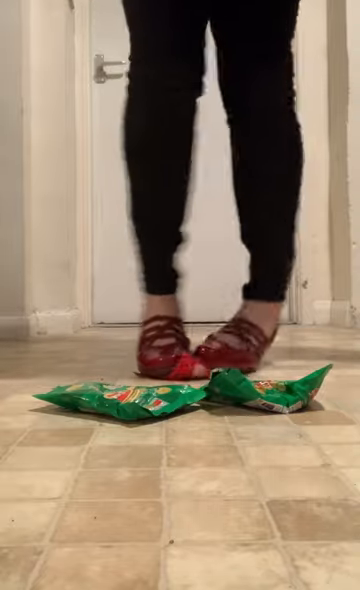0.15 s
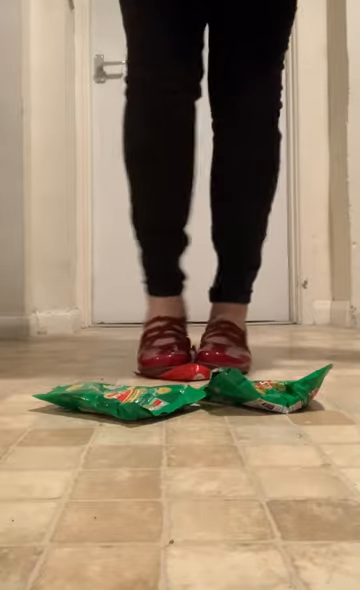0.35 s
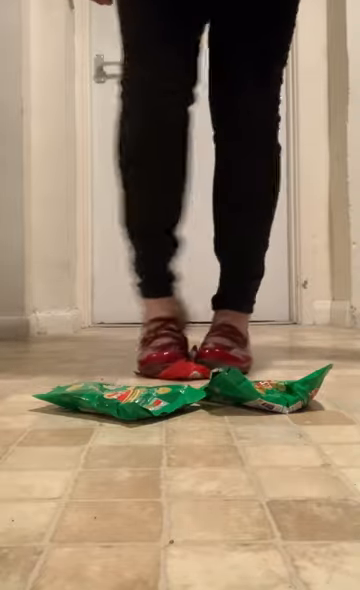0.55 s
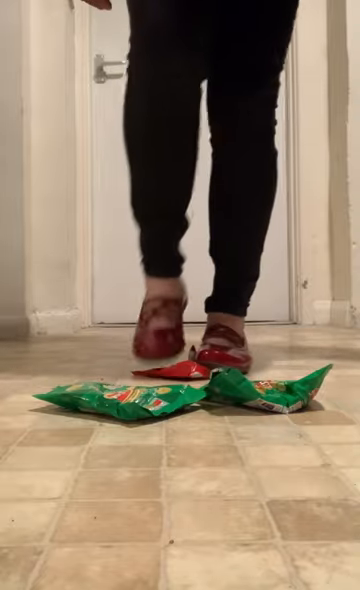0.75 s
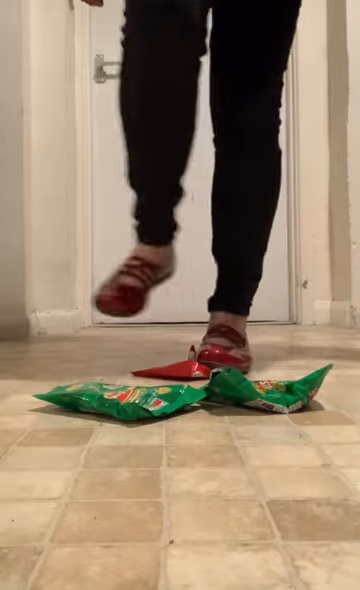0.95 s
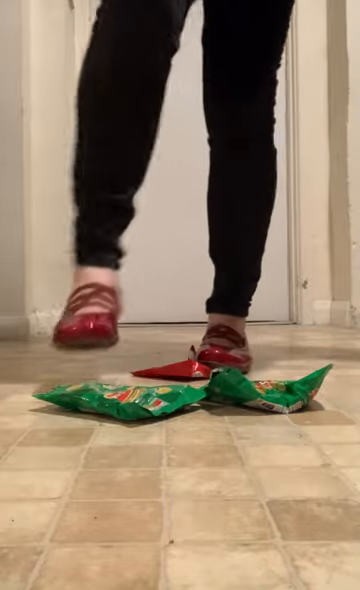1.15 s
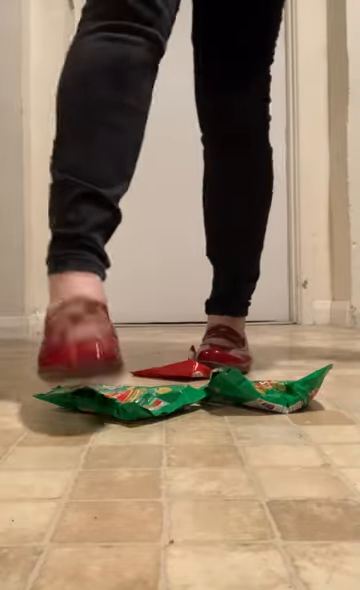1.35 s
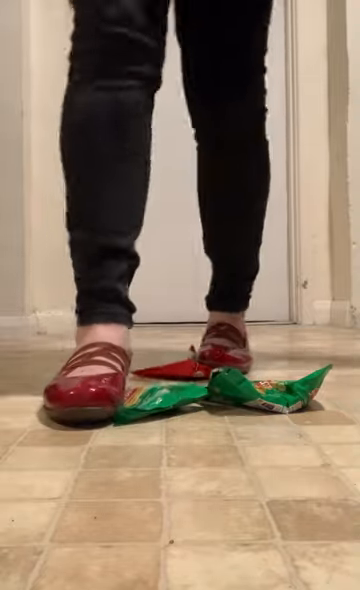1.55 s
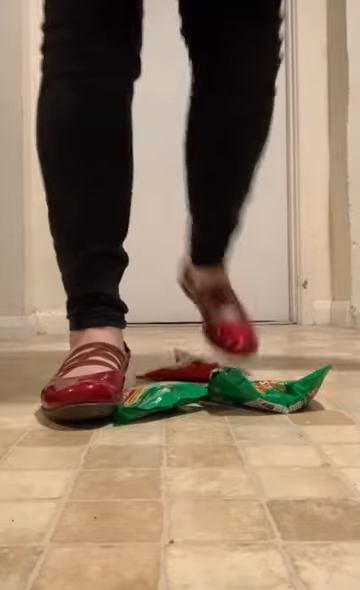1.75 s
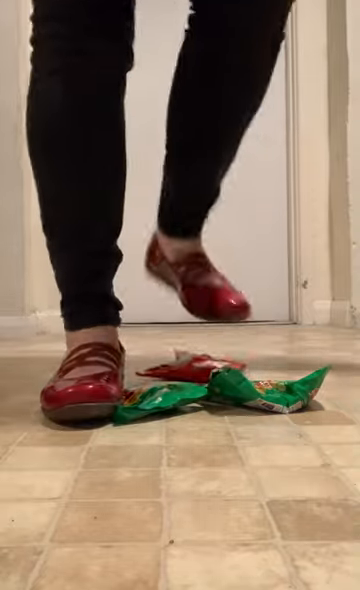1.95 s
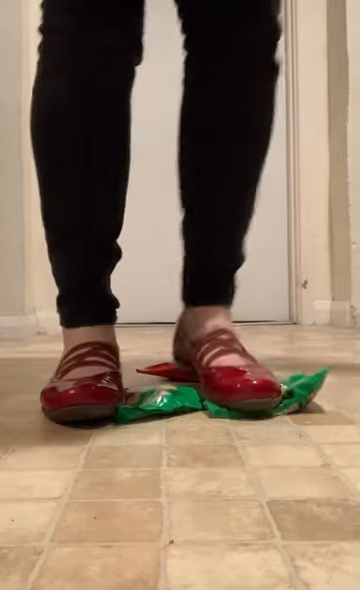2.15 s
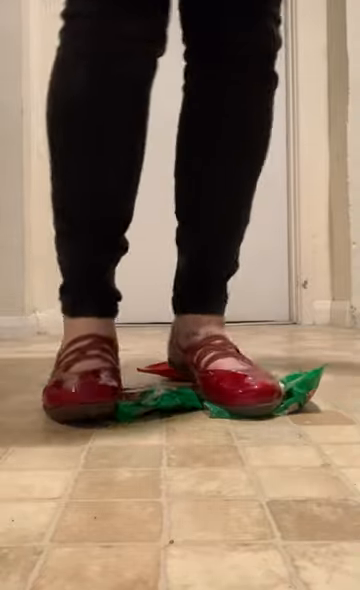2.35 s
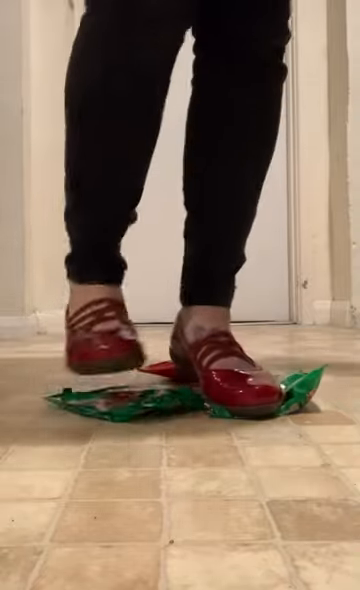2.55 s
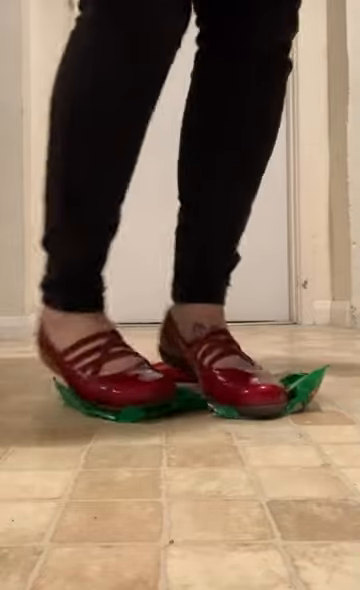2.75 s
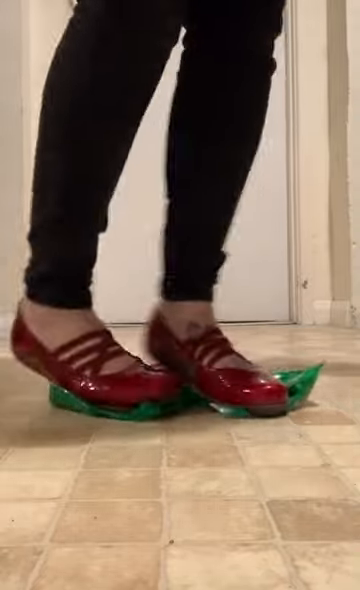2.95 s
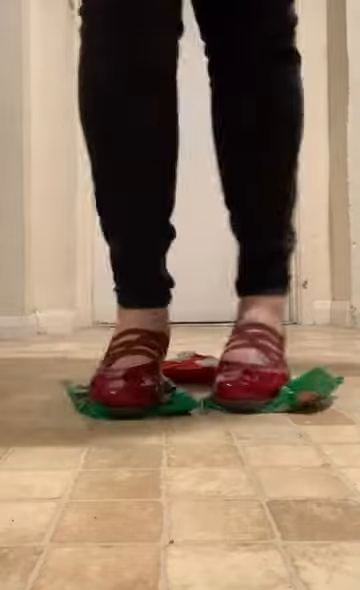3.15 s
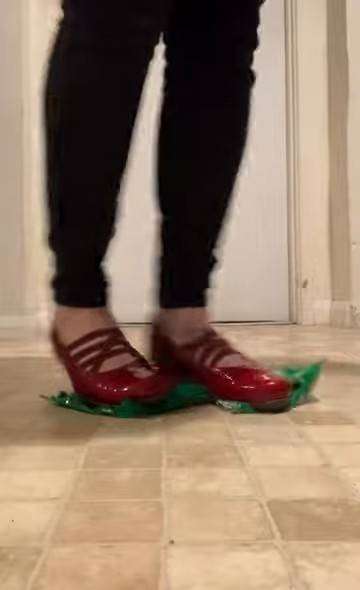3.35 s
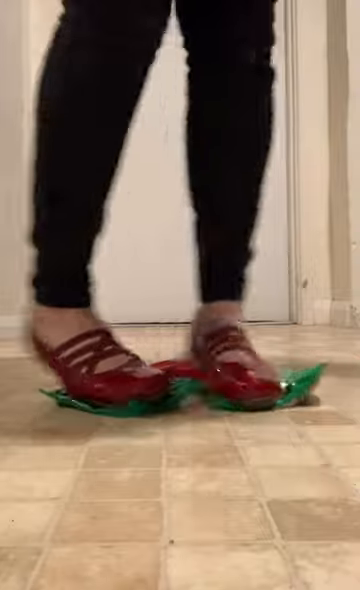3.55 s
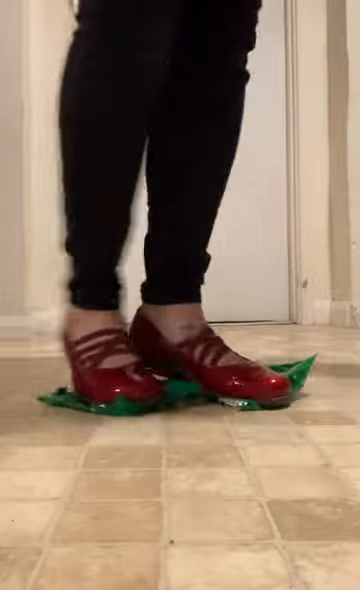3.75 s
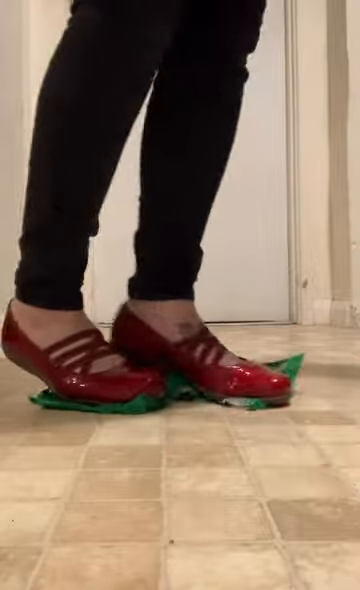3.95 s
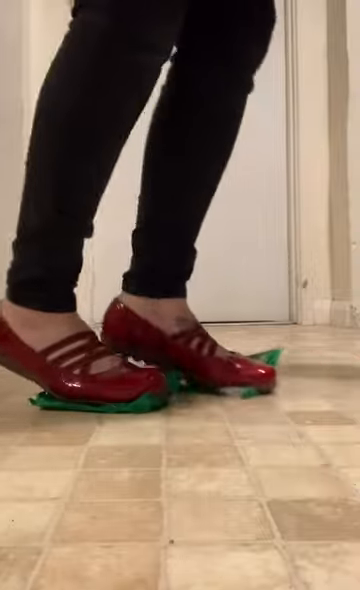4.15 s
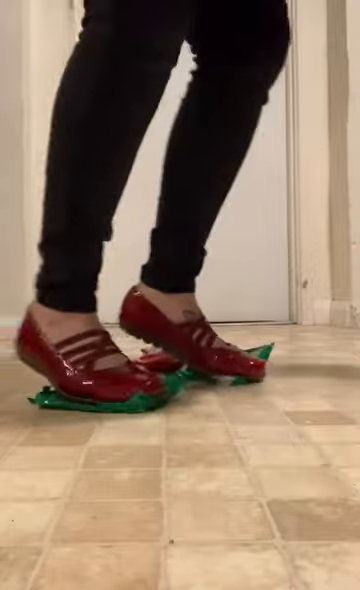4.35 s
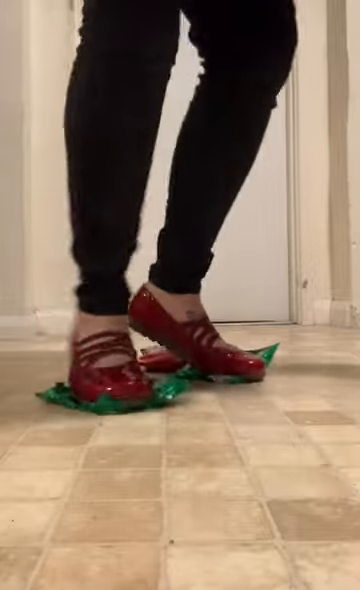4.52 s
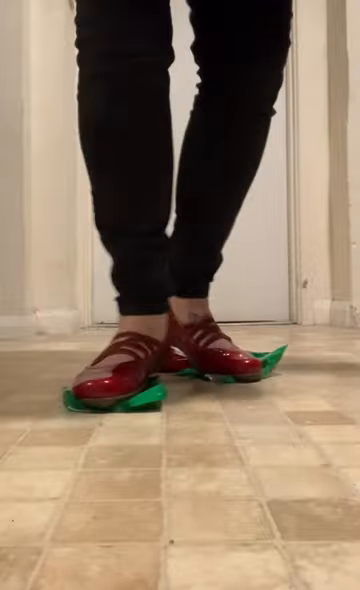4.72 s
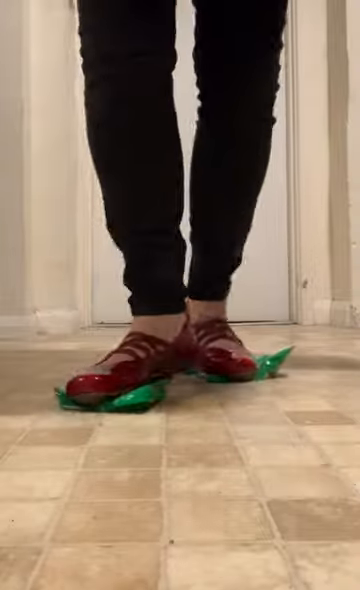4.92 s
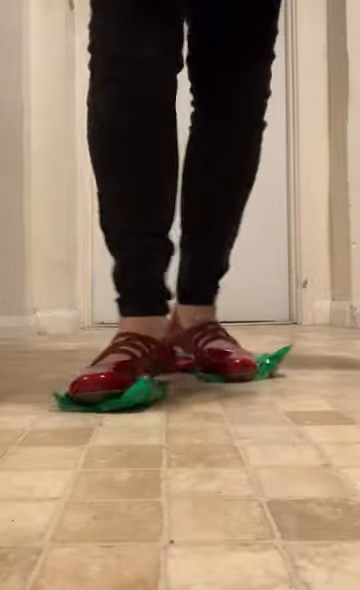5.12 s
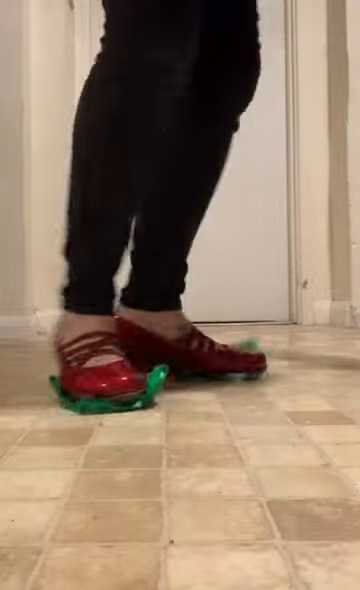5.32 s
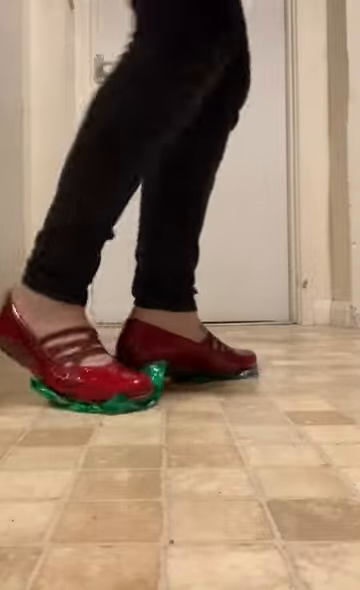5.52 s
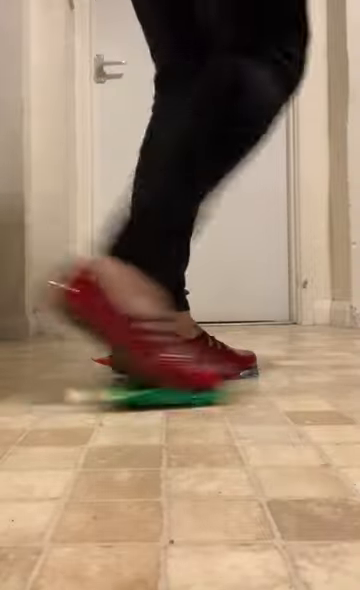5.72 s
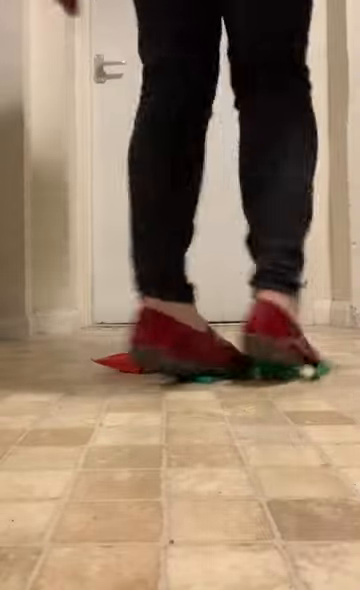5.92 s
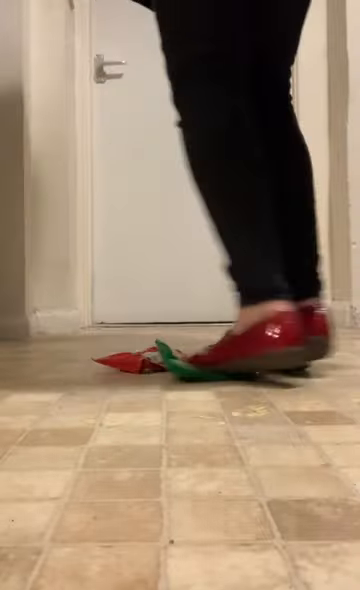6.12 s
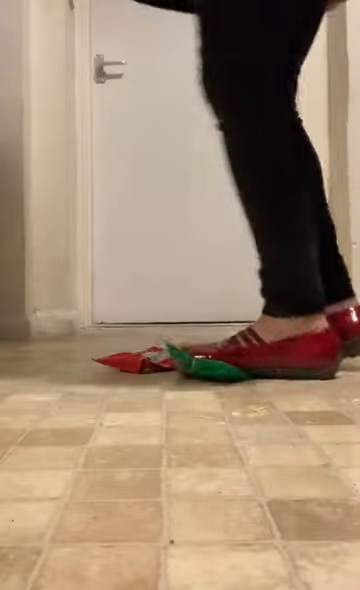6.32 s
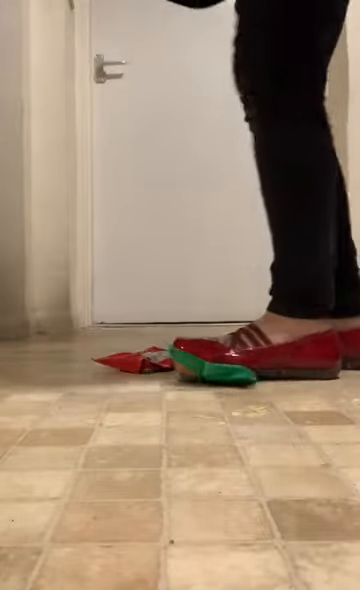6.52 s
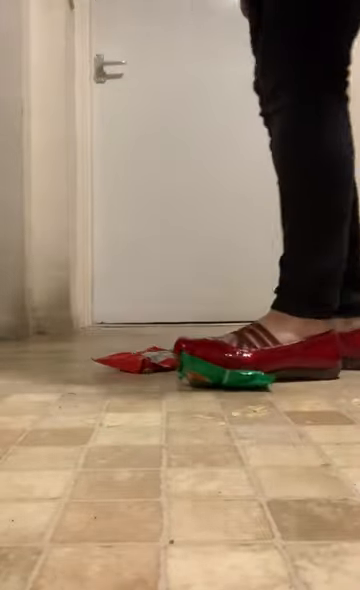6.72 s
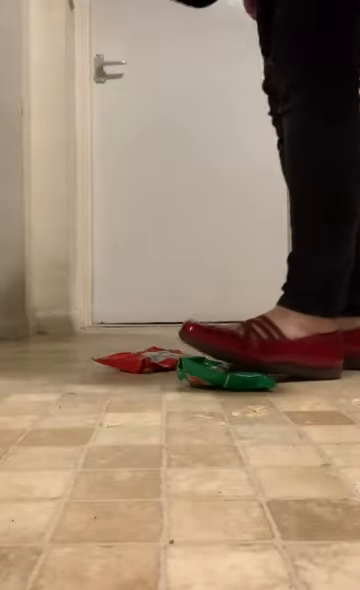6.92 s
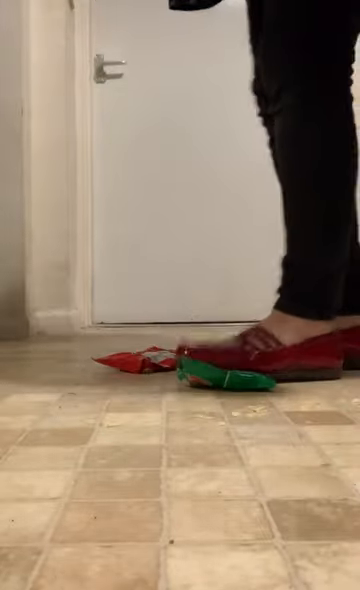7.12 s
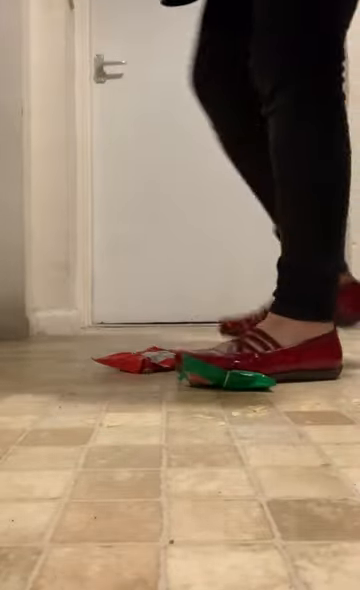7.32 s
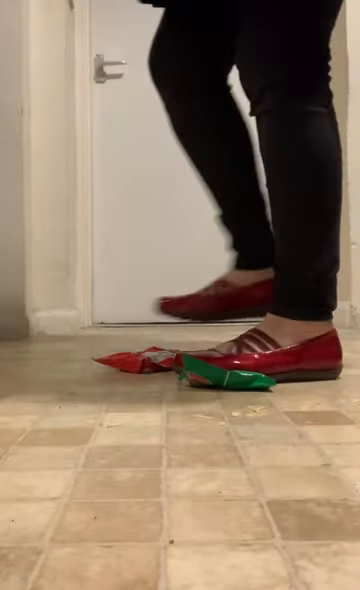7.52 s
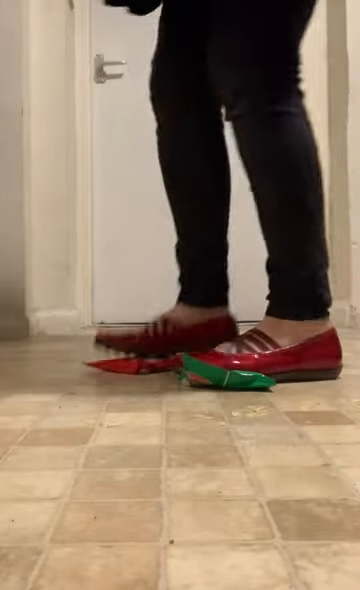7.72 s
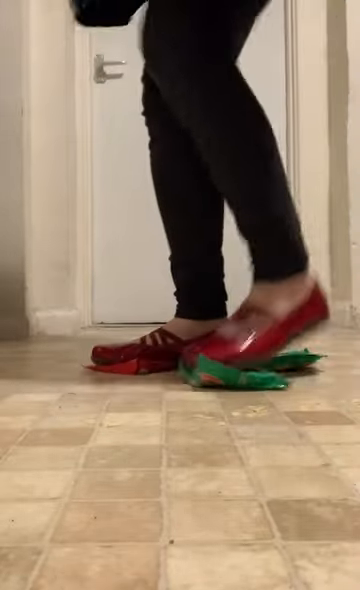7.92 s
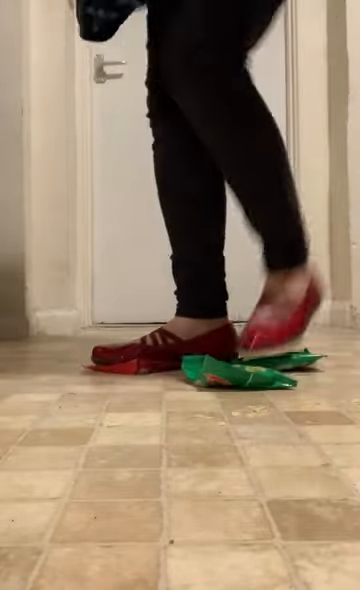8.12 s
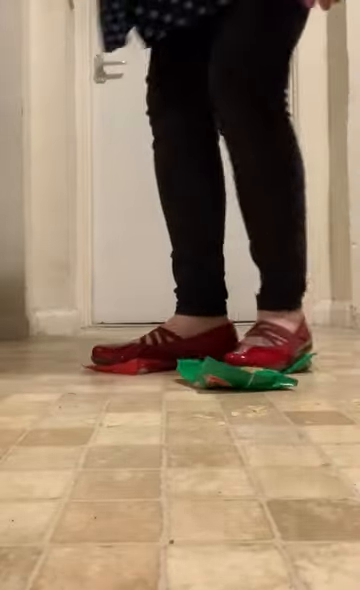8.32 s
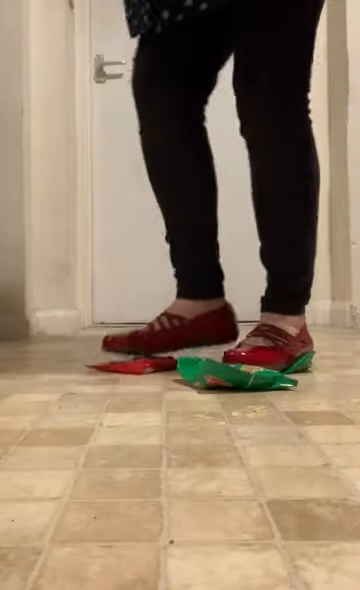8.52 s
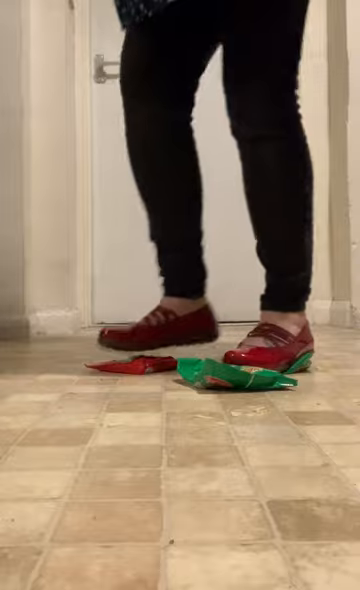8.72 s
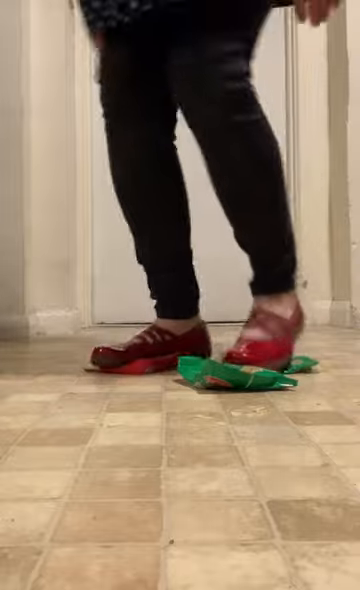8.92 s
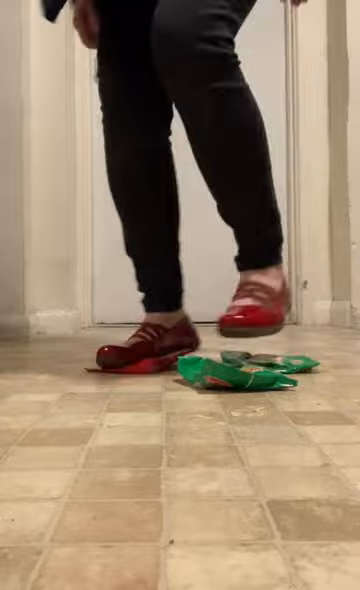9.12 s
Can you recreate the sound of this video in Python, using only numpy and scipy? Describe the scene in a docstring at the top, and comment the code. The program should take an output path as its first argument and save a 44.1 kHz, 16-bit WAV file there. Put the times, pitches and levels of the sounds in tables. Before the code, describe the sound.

Close to a stereo microphone on the hard floor of a small hallway, hard soles grind on crisp bags. A dense crackle opens, then come spaced stamps with loud crunches, a long rocking stretch of crinkling and snapping, a strong grinding burst near six seconds, and sparser treads and crackles to the end. Faint hum and still air lie underneath.

```python
"""A sole grinding on a bag of crisps is heard first, a dense crackle on the floor of a small hallway.
Hard soles go on to tread, rock and grind, close to a camera with two microphone ports: noisy fractures make
the crackle, and pitched pops with a crack and a rattle make the single snaps, loud or faint.
Footfalls slap the bag and thud on the floor in noise bursts; a few scuffs rasp and slips groan down in pitch.
Underneath lie still air, a faint mains hum and a low sine drone that swells and fades."""
import sys
import numpy as np
from scipy import signal
from scipy.fft import rfft, irfft, next_fast_len
from scipy.io import wavfile
from scipy.ndimage import uniform_filter1d, map_coordinates

SR = 44100
rng = np.random.default_rng(int(sys.argv[2]) if len(sys.argv) > 2 else 0)


def wrap_up_sound(samples):
    """Save the sound to the file named by the first command line argument, as 16-bit audio."""
    columns = np.atleast_2d(samples).T
    # keep every value between -1 and 1, then stretch to whole-number steps
    tamed = np.clip(columns, -1, 1)
    steps = np.round(tamed * 32767).astype(np.int16)
    wavfile.write(sys.argv[1], SR, steps)


N = 408807


def amp(db):
    """Decibels to gain."""
    return 10 ** (np.asarray(db) / 20)


def unit(x):
    """Scale to rms 1."""
    return x / np.sqrt(np.mean(x ** 2) + 1e-20)


def along(points, hz):
    """Read (f/Hz, value) points on a log frequency axis."""
    f, v = np.transpose(points)
    return np.interp(np.log(hz + 1), np.log(f + 1), v)


def curve(rows):
    """Read (t/s, value) rows at every sample."""
    return np.interp(np.arange(N) / SR, *np.transpose(rows))


def wobble(rate):
    """A smooth random curve with rate knots a second."""
    knots = rng.standard_normal(int(N * rate / SR) + 4)
    return map_coordinates(knots, [np.arange(N) * rate / SR])


def colour(x, spectrum, size=4096):
    """Causal minimum-phase filter with the given (f/Hz, level/dB) spectrum."""
    log_gain = np.log(amp(along(spectrum, np.fft.rfftfreq(size, 1 / SR))))
    cepstrum = irfft(log_gain)
    # folding the cepstrum forward in time makes the filter causal
    cepstrum[1:size // 2] *= 2
    cepstrum[size // 2 + 1:] = 0
    impulse = irfft(np.exp(rfft(cepstrum)))
    return signal.oaconvolve(x, impulse)[:len(x)]


def band(x, lo_hz, hi_hz):
    """The part of x between two frequencies, without delay."""
    edges = [lo_hz, min(hi_hz, SR / 2 - 1)]
    return signal.sosfiltfilt(signal.butter(2, edges, "band", fs=SR, output="sos"), x)


def swell(t, rise):
    """An envelope that peaks at 1 after rise seconds and dies away."""
    return t / rise * np.exp(1 - t / rise)


def add(track, s, sound):
    """Mix a sound into a track at s seconds."""
    room = track[max(round(s * SR), 0):][:len(sound)]
    room += sound[:len(room)]


# soles leaning and grinding on a bag: (start t/s, end t/s, level/dB, treble/dB, hollow/dB)
GRINDS = [(0.0, 0.076, -31.5, 4.5, 0.5), (0.152, 0.287, -30.5, 1, 0.5), (.58, 0.746, -43, 5.5, 2),
          (1.66, 1.747, -39.5, 2, -2), (1.93, 2.11, -47, -10, -2), (2.2, 2.393, -40.5, 8, 7.5),
          (2.477, 2.562, -45, 9, 5.5), (2.72, 3.95, -43.5, 0.5, 6), (4.082, 4.432, -39.5, 7, 6),
          (4.518, 4.757, -46.5, 4.5, 7.5), (4.784, 4.86, -42, 4.5, 4.5), (5.057, 5.57, -34.5, 5, 2.5),
          (5.617, 5.965, -29, 1.5, -0.5), (6.01, 6.155, -33.5, 1, 0), (6.201, 6.513, -38.5, 6, 4.5),
          (6.58, 6.992, -47, 1.5, 4.5), (7.203, 7.28, -37.5, 4, 6), (7.586, 7.67, -50, -1.5, -4),
          (7.83, 7.93, -38, 5.5, 3), (8.248, 8.475, -36, 1, 3), (8.54, 8.77, -48.5, 6, -3),
          (8.84, 8.998, -38, 6.5, 4.5), (9.02, 9.28, -43, 2.5, -4)]
# a grind sets in, slackens slowly while it lasts, and lets go
GRIND_RISE_DB_PER_S, GRIND_SAG_DB_PER_S, GRIND_FALL_DB_PER_S = 451, 1.5, 183
# short pushes of heel or toe as the weight rocks: (peak t/s, level/dB, treble/dB)
PUSHES = [(0.091, -24.5, -2.5), (0.415, -29, 1.5), (0.571, -28.5, -2.5), (.9, -55, -0.5),
          (1.172, -58.5, -8), (1.532, -26, -3), (2.804, -28.5, 2), (3.263, -23, 4), (3.413, -23.5, 5),
          (3.525, -24, 5), (3.679, -24.5, 7), (3.81, -27, 5.5), (3.945, -27.5, 2), (4.319, -30.5, 7.5),
          (4.985, -42, 0), (5.123, -28, -0.5), (5.718, -21.5, -0.5), (5.789, -24, 0), (5.913, -25, -19),
          (6.31, -32, -4), (6.465, -30.5, 0), (6.928, -41, 3), (7.275, -36.5, -3), (7.392, -40.5, 2.5),
          (7.902, -27.5, 3.5), (8.77, -34.5, -18)]
PUSH_RISE_DB_PER_S, PUSH_FALL_DB_PER_S = 319, 247
PUSH_HOLLOW_DB = 1  # low hollow sound of the bag, relative to the middle
# footfalls: (t/s, floor thud level/dB, bag slap level/dB, crush level/dB,
#             time for the bag to collapse t/s, treble/dB, hollow/dB)
FOOTFALLS = [(1.43, -54, -31.5, -19, 0.04, 1.5, 5), (2.126, -47, -62, -15, 0.022, 1, 3),
             (2.656, -42, -34.5, -21, 0.016, 5.5, 0), (3.02, -70, -47, -21, 0.042, 5, 0.5),
             (5.282, -47, -61, -29.5, 0.035, 5, -26), (6.323, -55, -55, -41, 0.046, 9, -17),
             (7.134, -64, -50, -29, 0.06, 0.5, 2.5), (7.693, -68, -46, -32.5, 0.038, -5, 8.5),
             (7.751, -58.5, -37.5, -23, 0.039, 0.5, 3.5), (8.161, -51, -26, -19, 0.022, 1, 4.5),
             (8.784, -55, -37, -25, 0.019, -0.5, -2.5)]
# the crunch peaks just after a footfall and dies fast; a weaker part lingers as the crumbs settle
PEAK_LAG_S, BURST_DB_PER_S, SETTLE_DB, SETTLE_DB_PER_S = 0.008, 203, -13.5, 56
REST_DB = -77  # a very faint steady rustle under everything


def crushing():
    """Grinds, pushes and footfalls add in power: crushing level, and treble and hollow relative to it, in dB."""
    t = np.arange(0, N, 32) / SR
    moves = []
    for start, end, db, treble_db, hollow_db in GRINDS:
        drop_db = np.maximum(GRIND_RISE_DB_PER_S * (start - t), GRIND_SAG_DB_PER_S * (t - start))
        release_db = GRIND_FALL_DB_PER_S * np.maximum(t - end, 0)
        moves.append((amp(db - drop_db - release_db), treble_db, hollow_db))
    for s, db, treble_db in PUSHES:
        drop_db = np.maximum(PUSH_RISE_DB_PER_S * (s - t), PUSH_FALL_DB_PER_S * (t - s))
        moves.append((amp(db - drop_db), treble_db, PUSH_HOLLOW_DB))
    for s, _, _, db, collapse_s, treble_db, hollow_db in FOOTFALLS:
        age = t - s - PEAK_LAG_S
        after = np.maximum(age, 0)
        burst = amp(-BURST_DB_PER_S * after)
        settling = amp(SETTLE_DB - SETTLE_DB_PER_S * after)
        collapse = np.clip(1 + age / collapse_s, 0, 1)
        moves.append((amp(db) * collapse * np.hypot(burst, settling), treble_db, hollow_db))
    power = amp(REST_DB) ** 2
    for gain, treble_db, hollow_db in moves:
        power = power + np.outer(amp([0, treble_db, hollow_db]), gain) ** 2
    middle, high, low = (curve(np.transpose([t, 10 * np.log10(p)])) for p in power)
    return middle, high - middle, low - middle


# spectral shape of the packets' crackle: (f/Hz, relative level/dB per Hz)
PACKET = [(120, -20), (250, -10.5), (500, -8), (850, -6), (1100, -1.5), (1900, 1), (2700, -5), (3500, -0.5),
          (5000, -7), (7300, -16.5), (8500, -13), (12500, -22.5)]
# the ring of the film wanders as its folds shift
WANDER_DB, WANDER_PER_S = 2.5, 22


def fractures(rate, spread_db, focus, even_s, count=18):
    """Tiny breaks of uneven size, each ringing briefly round a pitch of its own; high ones are mere clicks."""
    edges = np.geomspace(600, 17500, count + 1) - 500
    chance = rng.random((int(rate * N / SR), 3))
    when = (chance[:, 0] * N).astype(int)
    size = amp(spread_db * np.minimum(-np.log(1 - chance[:, 1]), np.log(60)))
    pitch = chance[:, 2] * (count + 1) - 1  # counted in bands
    width = focus * (1 + 4 * (pitch / count) ** 4)  # high breaks spread over more bands
    out = np.zeros(N)
    for k, (lo, hi) in enumerate(zip(edges, edges[1:])):
        share = np.exp(-((pitch - k) / width) ** 2) / np.sqrt(width)
        kicks = np.bincount(when, size * share * rng.choice([-1, 1], len(when)), N)
        ring = signal.sosfilt(signal.butter(2, [lo, hi], "band", fs=SR, output="sos"), kicks)
        out += unit(ring) * np.sqrt(hi - lo) * amp(WANDER_DB * wobble(WANDER_PER_S))
    out = colour(out, PACKET)
    # the foot does steady work: a big break relieves its neighbours
    nearby_power = np.abs(uniform_filter1d(out ** 2, int(even_s * SR)))
    return out / np.sqrt(nearby_power + 1e-12)


def crackle(crush_db, treble_db, hollow_db):
    """Crumbling crisps crunch densely, buckling film pops, creases tick brightly; all follow the crushing."""
    crunch = fractures(rate=7000, spread_db=0.0, focus=1.89, even_s=0.015)
    pops = band(fractures(rate=620, spread_db=4.5, focus=1.6, even_s=.04), 600, 6000)
    ticks = band(fractures(rate=110, spread_db=5.5, focus=12, even_s=.09), 3800, 13000)
    # under a full stamp the single pops merge into crunch
    single = amp(-.5 * np.maximum(crush_db + 27, 0))
    # the crisps give way in clumps with short lulls between
    clumps = amp((1 + 1.2 * single) * wobble(50))
    dense = amp(-5) * clumps * crunch * np.sqrt(2 - single ** 2)
    sparse = single * (amp(-3.5) * pops + amp(-5) * ticks)
    sound = (dense + sparse) * amp(crush_db)
    treble = (amp(treble_db) - 1) * band(sound, 4600, 24000)
    hollow = (amp(hollow_db) - 1) * band(sound, 127, 900)
    return sound + treble + hollow


# likeness of diffuse sound at the two microphone ports: (f/Hz, correlation -1 to 1)
ALIKE = [(120, 0.8), (300, 0.002), (1000, -0.026)]


def diffuse(count):
    """Stereo white noise arriving from all sides, mixed from mid and side to the given likeness."""
    likeness = np.clip(along(ALIKE, np.fft.rfftfreq(count, 1 / SR)), -1, 1)
    turn = np.arccos(likeness) / 2
    mid, side = rfft(rng.standard_normal((2, count))) * [np.cos(turn), np.sin(turn)]
    return irfft([mid + side, mid - side], count)


# low drone under the hallway, before its random wavering: (t/s, rms level/dB)
DRONE = [(1.2, -72), (2.75, -56), (3.7, -66.5), (4.0, -51), (4.5, -51), (5.05, -64), (5.7, -57.5),
         (7.0, -77)]
# mains hum: (f/Hz, rms level/dB)
HUM = [(100, -72.5), (200, -77)]
# spectral shape of the hallway's still air: (f/Hz, relative level/dB per Hz)
AIR = [(20, -11), (100, 0.5), (600, -12.5), (16000, -37)]


def background(drone_hz=66):
    """A drone wavering in pitch and level with a weak octave, steady hum sines and diffuse air noise."""
    t = np.arange(N) / SR
    phase = 2 * np.pi * np.cumsum(drone_hz * (1 + 0.0101 * wobble(1.6))) / SR
    tone = np.sin(phase) + amp(-17.5) * np.sin(2 * phase)
    drone = amp(curve(DRONE) + wobble(13.0)) * tone
    hum = sum(amp(db) * np.sin(2 * np.pi * hz * t) for hz, db in HUM)
    air = unit(np.array([colour(side, AIR) for side in diffuse(N)]))
    return np.sqrt(2) * (drone + hum) + amp(-69.0) * air  # sqrt(2): peak from rms


# lesser snaps come by chance: so many a second, at most this far above the crushing and under the cap
STRAY_PER_S, STRAY_DB, STRAY_CAP_DB = 13, 7.5, -25


def strays(crush_db):
    """Rows like SNAPS for lesser snaps at random moments; their level follows the crushing up to a cap."""
    moment, weakness, smallness = rng.random((int(STRAY_PER_S * N / SR), 3)).T
    when = (moment * N).astype(int)
    ceiling_db = np.minimum(crush_db[when] + STRAY_DB, STRAY_CAP_DB)
    db = ceiling_db - 4 * (weakness + smallness)
    return np.transpose([when / SR, db, 1400 * 3.5 ** smallness])


# single snaps of film or crisp that stand out, loud or faint:
# (t/s, level/dB before an 11 dB cut to rms, pitch f/Hz)
SNAPS = [(0.7142, -20.5, 2100), (1.1671, -43, 3750), (1.2792, -49, 1750), (1.2994, -45, 3500),
         (1.4103, -22, 2150), (1.5069, -20, 1700), (1.5827, -24, 2450), (1.7249, -29, 2150),
         (1.9838, -26, 1600), (2.1405, -11, 2000), (2.3618, -28, 1500), (2.3868, -27, 2700),
         (2.4075, -28, 4300), (2.4791, -32, 2750), (2.5262, -30, 2200), (2.5866, -33, 4050),
         (2.7451, -19, 6800), (2.7698, -24, 1900), (2.7985, -20.5, 1700), (2.8124, -22, 2600),
         (2.8727, -23, 1950), (2.9906, -25, 1700), (3.0204, -15, 2500), (3.0558, -19, 2700),
         (3.092, -24, 4800), (3.1729, -32, 2800), (3.5312, -17, 3100), (3.6863, -16, 2100),
         (3.8027, -20, 3850), (4.0546, -31, 1650), (4.4703, -22, 1550), (4.6434, -33, 1750),
         (4.7872, -25, 2600), (4.8019, -29, 2750), (4.8885, -31, 1900), (5.2046, -25, 2900),
         (5.2693, -22, 3100), (5.2863, -19, 1900), (5.2938, -16, 2100), (5.3999, -24, 1700),
         (5.4504, -23.5, 3000), (5.5416, -20, 1550), (5.588, -23.5, 2200), (5.6159, -22, 5800),
         (5.6415, -21.5, 3150), (5.9103, -19, 2300), (5.9487, -22, 1700), (6.0314, -26, 2000),
         (6.3178, -24, 1800), (6.7346, -38, 2050), (6.7588, -37, 2800), (6.8865, -37, 1600),
         (6.9296, -33, 1850), (7.0622, -39, 1650), (7.0923, -37, 3600), (7.1398, -20, 2400),
         (7.1489, -18.5, 1750), (7.3296, -33, 3750), (8.1695, -11.5, 2000), (8.2583, -23, 1650),
         (8.4269, -28, 1700), (8.4626, -27.5, 1800), (8.4874, -29, 2000), (8.6331, -29, 2800),
         (8.7073, -36, 2000), (8.9056, -24, 2050), (8.9478, -24, 2300), (8.9807, -28, 4350),
         (9.0093, -26, 2200), (9.0285, -30, 2250), (9.082, -25.5, 2000), (9.1332, -28, 3400),
         (9.1798, -29.5, 1700)]
# the pop peaks after this share of a cycle; the crease's crack is stronger in high snaps (dB at 2 kHz)
POP_CYCLES, CRACK_DB, CRACK_DB_PER_OCT = .8, -9, 11


def snaps(rows):
    """A fold flips through: film pops at a pitch set by the fold's size, the crease cracks, crumbs rattle."""
    out, t = np.zeros(N), np.arange(SR // 50) / SR
    for s, db, hz in rows:
        grit, crumbs = (unit(colour(rng.standard_normal(len(t)), PACKET)) for _ in range(2))
        gritty_tone = np.sin(2 * np.pi * hz * t) + .5 * grit
        pop = band(swell(t, POP_CYCLES / hz) * gritty_tone, 600, 14000)
        crack = band(swell(t, .00025) * rng.standard_normal(len(t)), 1500, 10000)
        crack_db = CRACK_DB + CRACK_DB_PER_OCT * np.log2(hz / 2000)
        rattle = amp(-10) * unit(swell(t, .0016) * crumbs)
        snap = unit(pop) + amp(crack_db) * unit(crack) + rattle
        add(out, s, amp(db - 11) * unit(snap))
    return out


# air slapped out of a bag, spectral shape: (f/Hz, relative level/dB per Hz)
SLAP = [(80, -45), (170, -7), (270, -9.5), (1000, 7), (2700, 3.5), (9000, -22)]
# floor under the heel, spectral shape: (f/Hz, relative level/dB per Hz)
THUD = [(20, -12), (50, -12), (65, 10.5), (110, -4), (600, -18.5)]


def footfalls():
    """The sole slaps the air out of a bag and its weight thuds on the floor: two coloured noise bursts."""
    out, t = np.zeros(N), np.arange(SR // 4) / SR
    for s, thud_db, slap_db, *_ in FOOTFALLS:
        slap = unit(colour(swell(t, 0.0059) * rng.standard_normal(len(t)), SLAP))
        thud = unit(colour(swell(t, 0.011) * rng.standard_normal(len(t)), THUD))
        add(out, s, amp(slap_db) * slap + amp(thud_db) * thud)
    return out


# soles brushing the floor: (t/s, level/dB)
SCUFFS = [(4.02, -40.5), (6.845, -48), (6.928, -47), (8.022, -48)]
SCUFF_HZ, SCUFF_RISE_S = (600, 1250), 0.0066


def scuffs():
    """A sole brushes the floor with a short dull rasp of band-limited noise."""
    out, t = np.zeros(N), np.arange(SR // 12) / SR
    for s, db in SCUFFS:
        rasp = unit(band(rng.standard_normal(len(t)), *SCUFF_HZ))
        add(out, s, amp(db) * swell(t, SCUFF_RISE_S) * rasp)
    return out


# soles peeling or slipping on the floor: (t/s, peak level/dB)
SLIPS = [(6.332, -40), (8.804, -35.5)]
SLIP_HZ, SLIP_FALL_OCT_PER_S, SLIP_RISE_S = 333, 35, 0.0062


def slips():
    """A short low groan of the sole, a sine that drops in pitch as the foot comes to rest."""
    out, t = np.zeros(N), np.arange(SR // 12) / SR
    phase = 2 * np.pi * np.cumsum(SLIP_HZ * 2 ** (-SLIP_FALL_OCT_PER_S * t)) / SR
    for s, db in SLIPS:
        add(out, s, amp(db) * swell(t, SLIP_RISE_S) * np.sin(phase))
    return out


# the hallway's ring: (f/Hz, 60 dB decay time t/s)
HALL = [(100, 0.53), (500, 0.097), (4000, 0.28), (14000, 0.12)]
# strength of the hallway's answer: (f/Hz, level/dB)
WET = [(100, -12), (650, -1.5), (1600, -8.5), (2800, -3), (4500, -22.5), (9000, -3.5), (14000, -40)]


def hallway(x, count=24):
    """Walls and door answer with decaying noise, redrawn at regular steps and crossfaded."""
    out, hop = np.zeros((2, N)), N // count
    for k in range(count + 1):
        hz, t, z = signal.stft(diffuse(SR // 2), SR, nperseg=256)
        t60 = along(HALL, hz)[:, None]
        decay = amp(along(WET, hz)[:, None] - 60 * t / t60)
        # equal energy whatever the decay time
        fade = decay * np.sqrt(2 * np.log(1000) / (t60 * SR))
        tail = signal.istft(z * fade, SR, nperseg=256)[1]
        span = np.arange(max(k - 1, 0) * hop, min((k + 1) * hop, N))
        piece = x[span] * np.cos(np.pi / 2 * (span / hop - k))  # crossfades with its neighbours
        for side, echo in zip(out, tail):
            add(side, span[0] / SR + .003, signal.fftconvolve(piece, echo))
    return out


# phase by which the right microphone port leads, bent by the floor's bounce: (f/Hz, phase/rad)
LEAD = [(120, 0), (300, -0.6), (650, 0.95), (800, 1.7), (1100, -2), (1250, -2.5), (1450, -6), (2150, -4.5),
        (2450, -4.5), (2650, -7.5), (2950, -8.5), (4800, -9.5), (8500, -6), (14000, -2.5)]


def scene():
    """Floor sound reaches the two microphone ports out of step, then once more off the door."""
    crush_db, treble_db, hollow_db = crushing()
    feet = crackle(crush_db, treble_db, hollow_db)
    feet = feet + snaps([*SNAPS, *strays(crush_db)]) + footfalls() + scuffs() + slips()
    size = next_fast_len(N + SR // 2)
    hz = np.fft.rfftfreq(size, 1 / SR)
    lead = np.interp(hz, *np.transpose(LEAD))
    door = 1 + amp(-18) * np.exp(-2j * np.pi * hz * .0077)  # one echo 7.7 ms late
    out_of_step = np.exp(.5j * np.array([-lead, lead]))
    ports = irfft(rfft(feet, size) * door * out_of_step, size)[:, :N]
    return ports + hallway(feet) + background()


TOP_HZ = 15900  # the camera's band limit


def record(dry):
    """The camera rounds off the highest peaks and keeps nothing above its band limit."""
    soft = dry / (1 + np.abs(dry / .85) ** 4) ** (1 / 4)
    size = next_fast_len(N + SR // 2)
    kept = np.fft.rfftfreq(size, 1 / SR) < TOP_HZ
    return irfft(rfft(soft, size) * kept, size)[:, :N]


dry = scene()
out = record(dry)
wrap_up_sound(out)
```